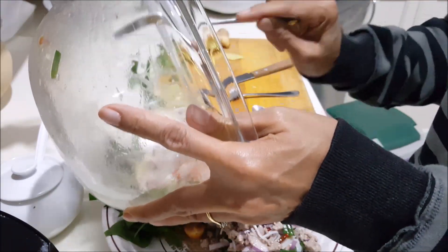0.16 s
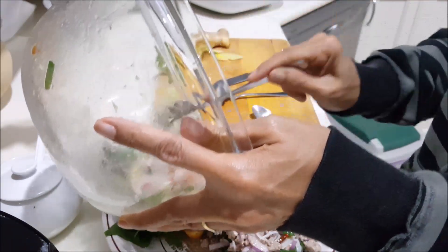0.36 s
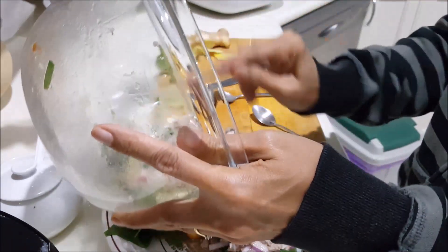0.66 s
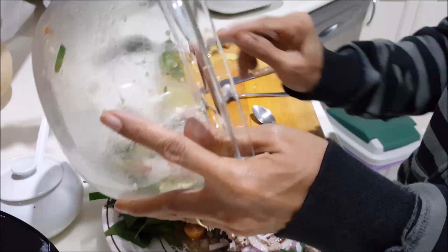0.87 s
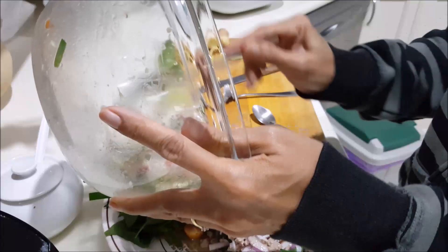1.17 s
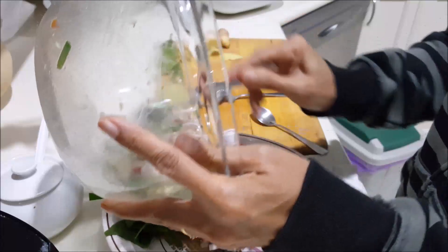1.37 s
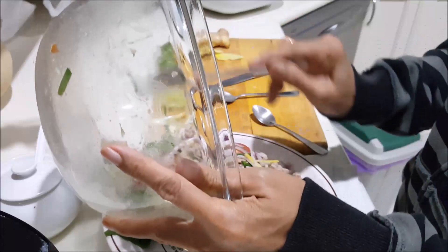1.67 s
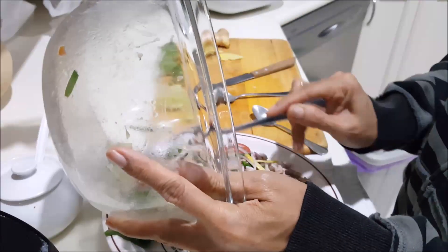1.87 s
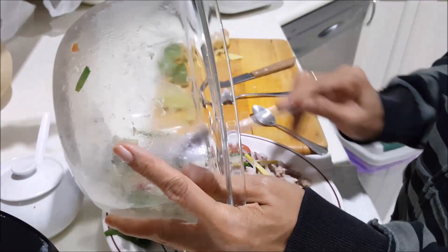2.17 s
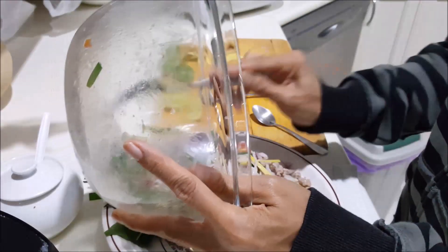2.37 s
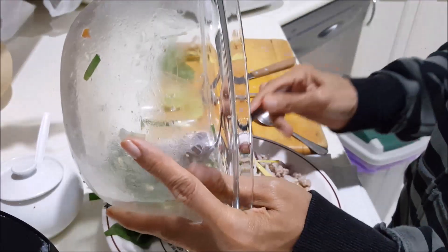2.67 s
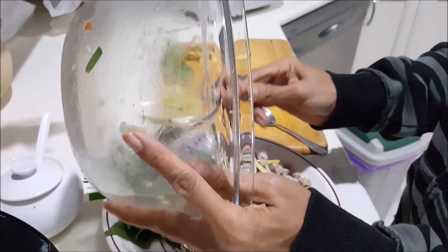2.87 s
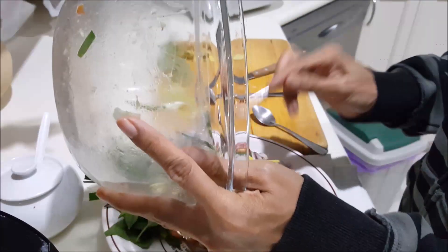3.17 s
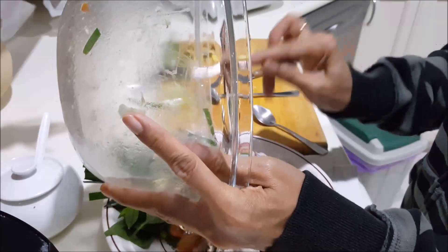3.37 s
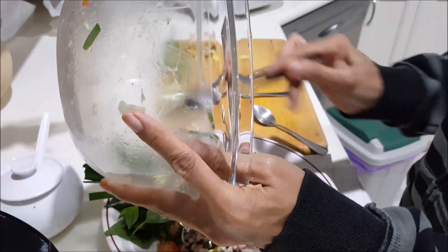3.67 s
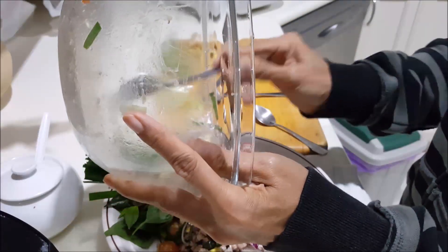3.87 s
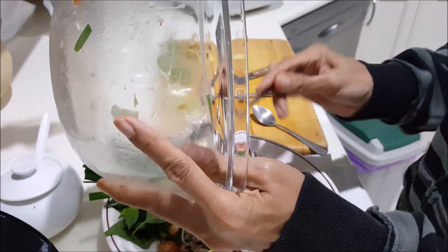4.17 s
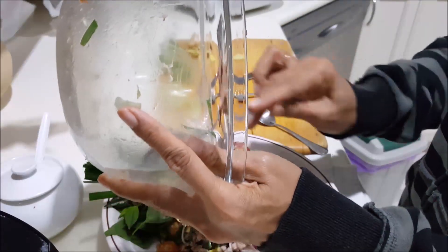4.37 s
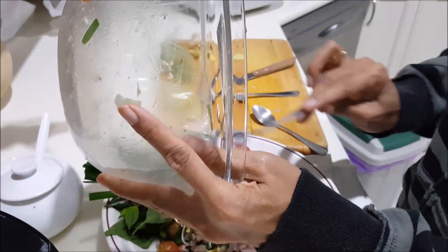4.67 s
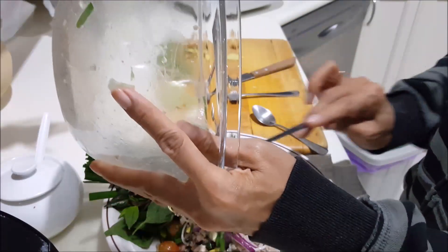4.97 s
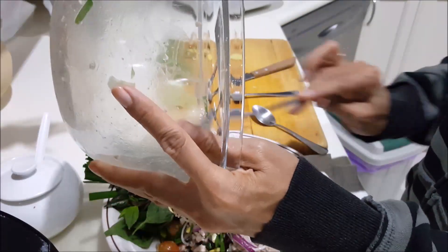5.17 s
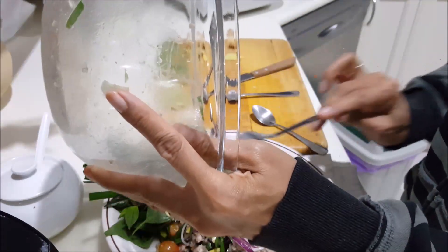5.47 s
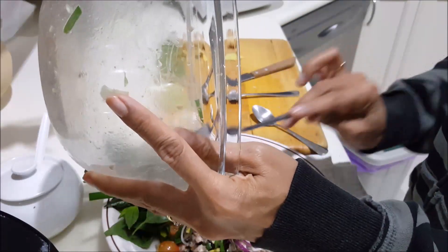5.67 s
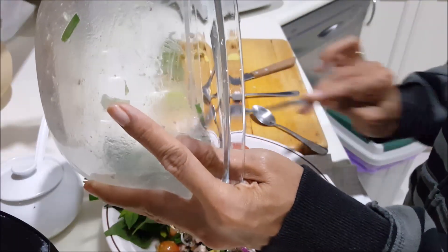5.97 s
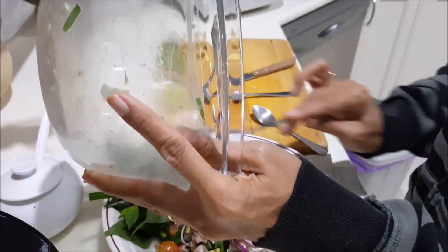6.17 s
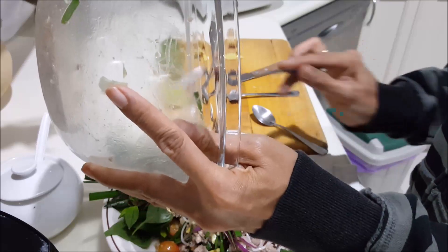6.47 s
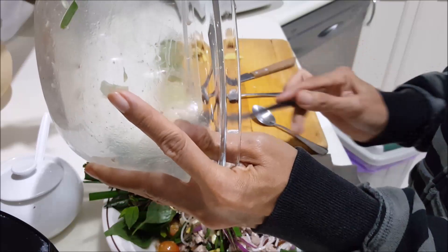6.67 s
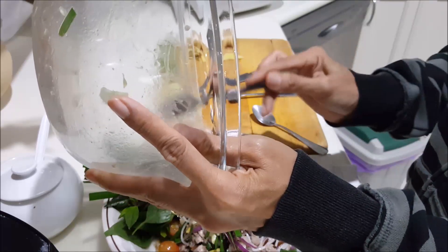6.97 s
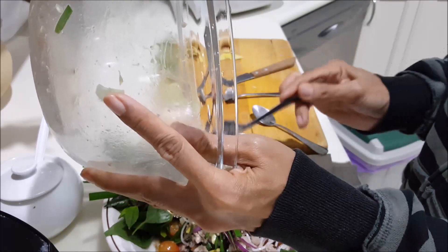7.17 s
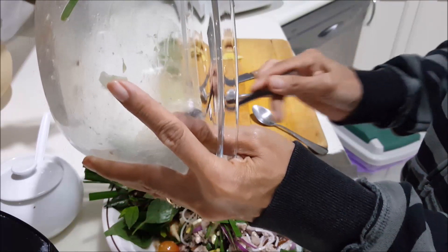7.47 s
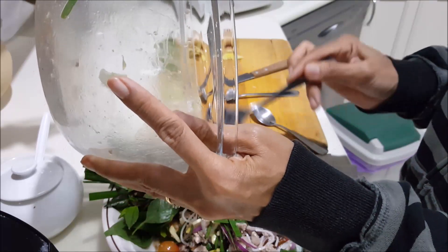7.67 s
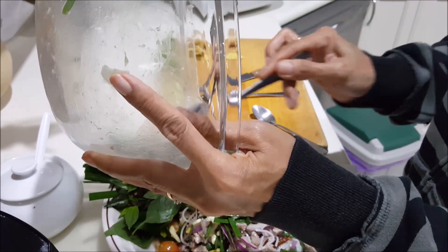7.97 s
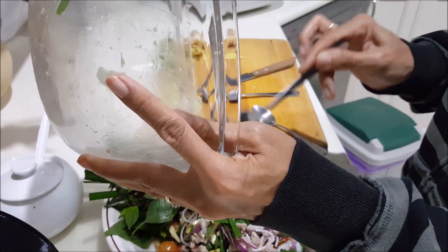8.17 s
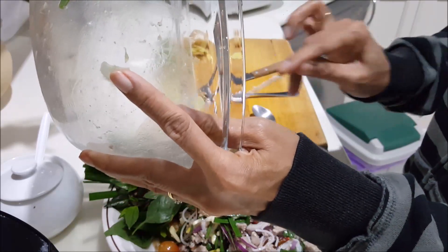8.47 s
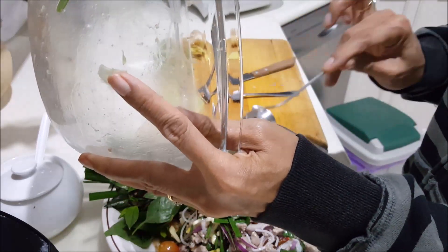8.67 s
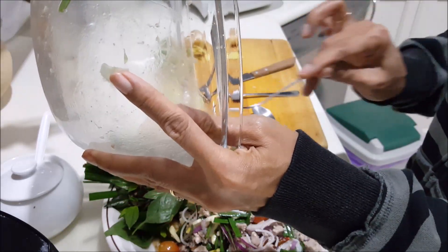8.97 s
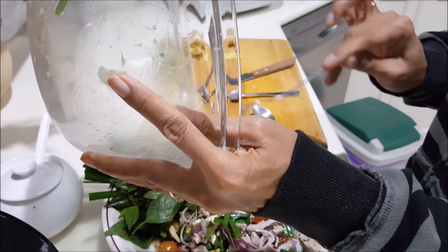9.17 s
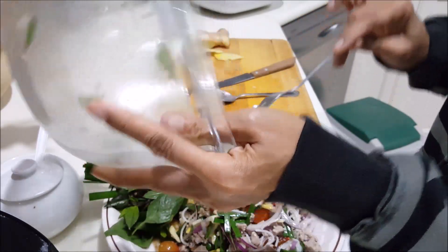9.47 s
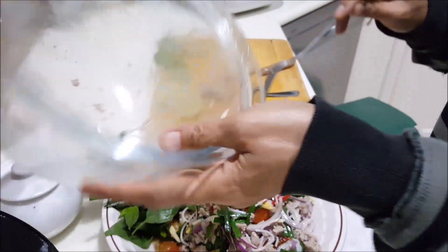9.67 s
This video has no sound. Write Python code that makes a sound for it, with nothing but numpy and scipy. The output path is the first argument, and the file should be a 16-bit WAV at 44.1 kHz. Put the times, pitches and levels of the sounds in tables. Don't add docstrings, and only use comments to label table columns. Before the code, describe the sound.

Sharp glassy clinks from a steel spoon against a wet glass bowl, with tiny squeaks and soft food thuds, in a humming, reverberant kitchen.

```python
import sys
import numpy as np
from scipy import signal
from scipy.io import wavfile

SR = 44100
rng = np.random.default_rng(int(sys.argv[2]) if len(sys.argv) > 2 else 0)


def makeup_ratio(level_db):
    decades = np.asarray(level_db, float) / 20
    return 10 ** decades


def master(y):
    cut = np.clip(np.atleast_2d(y).T, -1, 1)
    pcm = np.round(cut * 32767)
    wavfile.write(sys.argv[1], SR, pcm.astype(np.int16))


N = 433503
LEAD = 4410

BOWL_HZ = [463, 487, 1190, 1228, 2197, 2224, 2315, 3420, 3458, 3512, 4915, 4937]
# (level [dB], t60 [s])
TIP_HZ = [4382, 6406, 6837, 7197, 8290, 8430, 9485, 10690, 11540, 12130, 12770, 14050, 14410, 15390]
TIP = [(3.5, 0.01), (-5.5, 0.12), (4, 0.092), (-5.5, 0.099), (2.5, 0.1), (-6, 0.058), (-20.5, 0.022),
       (-1.5, 0.042), (-27.5, .06), (-24.5, 0.054), (-2, 0.091), (1, 0.088), (-13, .07), (-30.5, .05)]
# (time [s], glass peak [dB], glass lean to low modes [dB], spoon peak [dB], spoon lean to 8 kHz [dB])
BLOWS = [
    (0.6263, -16.5, -1, -18, -5.5),
    (1.3079, -14, -5.5, -15.5, -9.5),
    (1.6856, -11.5, -6, -18, -3),
    (3.3845, -11, -3.5, -11, -8.5),
]
LATE_BLOWS = [
    (6.583, -14.5, 0.5, -39, 1),
    (6.6534, -10.5, -7, -18.5, -14.5),
    (6.7714, -31.5, -35, -64, -4),
    (6.9482, -18.5, -11, -21, -9),
    (7.1617, -20.5, 0.5, -27.5, -7),
    (7.4462, -9.5, -8.5, -17, -2),
    (7.6256, -40.5, 4, -57, 4),
    (7.9044, -15, -14, -24.5, -4.5),
]
DEAD_BLOWS = [
    (4.4025, -25, -15, -28.5, -1.5),
    (8.4518, -42, 8.5, -33.5, 0.032),
]
EDGE_TAPS = [(-.035, -42, -5, -39.5, 3), (0.2384, -27.5, -27, -32.5, 4), (0.418, -68, 2, -62, 13.5),
             (0.955, -41.5, -7.5, -37, 9.5), (1.0856, -53.5, -10, -64.5, -3),
             (2.3914, -47.5, 1, -35.5, 4.5), (2.523, -58, -2.5, -48, -11), (2.7057, -70, -0.5, -56, 2),
             (2.9212, -55, 9, -46.5, 17), (3.9215, -48.5, 2.5, -41.5, 13), (4.1348, -51, -8, -46.5, 2.5),
             (4.545, -68, 0, -50, -13), (4.5934, -74.5, -4, -66, 18)]
TIP_TAPS = [
    (4.915, -29, -10.5, -32, -0.5),
    (5.0981, -41, 1, -43.5, -1),
    (5.3566, -29, -7.5, -24.5, 3.5),
    (5.3844, -37.5, -5.5, -46, 19.5),
    (5.8034, -35.5, 3.5, -35.5, 5),
    (5.8194, -67, -3, -44.5, -17),
    (6.1569, -26, -28, -31, -6),
    (6.188, -32.5, -3.5, -56, 23),
    (6.2094, -37.5, -10, -33.5, 6),
    (8.9912, -31, -2, -35, 3),
]


def rms_one(x):
    return x / np.sqrt(np.mean(x ** 2) + 1e-20)


def at_hz(points, hz):
    points = np.array(points)
    return np.interp(np.log(hz), np.log(points[:, 0]), points[:, 1])


def band(x, low_hz, high_hz):
    sos = signal.butter(2, [low_hz, min(high_hz, .46 * SR)], "band", fs=SR, output="sos")
    return signal.sosfilt(sos, x)


def ring(clicks, hz, t60_s):
    r = makeup_ratio(-60 / (t60_s * SR))
    w = 2 * np.pi * hz / SR
    return signal.lfilter([0, np.sin(w)], [1, -2 * r * np.cos(w), r * r], clicks + 1e-18)


def fading(clicks, tau_s):
    return signal.lfilter([1], [1, -np.exp(-1 / (tau_s * SR))], clicks + 1e-18)


def clock():
    return (np.arange(N + LEAD) - LEAD) / SR


def clicks_at(events):
    clicks = np.zeros(N + LEAD)
    clicks[[round(s * SR) + LEAD for s, db in events]] = makeup_ratio(np.array(events)[:, 1])
    return clicks


def room_tone():
    # (pitch [Hz], level [dB per Hz])
    spectrum = [(25, -39.5), (42, -22.5), (72, -9), (127, -7), (354, -11.5), (476, -13), (863, -17.5),
                (1400, -22.5), (3520, -32.5), (7000, -41.5), (11000, -46.5), (16000, -47)]
    # (pitch [Hz], left-right likeness [0..1])
    likeness = [(30, 0.65), (120, 1), (400, 0.5), (1500, 0.19), (8000, .05)]
    edges_hz = 22 * 2 ** np.arange(0, 10, .5)
    white = rng.standard_normal((2, 2, N + LEAD))
    out = 0
    for k, (low, high) in enumerate(zip(edges_hz, edges_hz[1:])):
        mid, side = band(white[k % 2], low, high)
        hz = np.sqrt(low * high)
        alike = np.clip(at_hz(likeness, hz), 0, 1)
        stereo = np.sqrt(1 + alike) * mid + np.sqrt(1 - alike) * side * [[1], [-1]]
        out = out + makeup_ratio(at_hz(spectrum, hz)) * stereo
    return makeup_ratio(-54.5) * rms_one(out)


def refrigerator():
    mains_hz, mains_db = 60, -59.5
    drone_hz, drone_db, swing_db = 100, -57.5, 3.5
    waver_hz = 3.7 * rms_one(band(rng.standard_normal(N + LEAD), 4.9, 19))
    swell_db = swing_db * rms_one(band(rng.standard_normal(N + LEAD), 0.31, 7.6))
    drone = np.sin(np.cumsum(drone_hz + waver_hz) * 2 * np.pi / SR) * makeup_ratio(drone_db + swell_db)
    mains = makeup_ratio(mains_db) * np.sin(2 * np.pi * mains_hz * clock())
    return np.sqrt(2) * (mains + drone)


def kitchen(x):
    # (pitch [Hz], t60 [s])
    decay = [(300, 1), (1000, 0.78), (2500, 0.77), (6000, 0.64), (10000, 0.59), (15000, 0.6)]
    s = np.arange(SR) / SR
    white, tail = rng.standard_normal((2, SR)), 0
    edges_hz = 150 * 2 ** np.arange(0, 7.6, .5)
    for low, high in zip(edges_hz, edges_hz[1:]):
        tail = tail + band(white, low, high) * makeup_ratio(-60 * s / at_hz(decay, np.sqrt(low * high)))
    early = 1 + 1.7 * np.exp(-s / 0.035)
    onset = np.clip((s - .002) / 0.0024, 0, 1)
    tail = rms_one(tail * early * onset) / np.sqrt(SR)
    return signal.fftconvolve(x[None], tail, axes=1)[:, :len(x)]


def thuds():
    # (time [s], level [dB])
    falls = [
        (0.235, -49),
        (0.949, -45),
        (2.391, -44.5),
        (2.921, -47),
        (3.382, -40),
        (3.921, -39),
        (4.399, -46.5),
        (5.355, -40),
    ]
    clicks = clicks_at(falls)
    return ring(clicks, 290, 0.064) + 0.2 * ring(clicks, 370, 0.013)


def nudges():
    # (time [s], level [dB])
    pushes = [
        (6.32, -49),
        (7.655, -43),
        (8.155, -49.5),
        (8.625, -42.5),
    ]
    return ring(clicks_at(pushes), BOWL_HZ[0], 0.1)


def stick_slip(rows, over_db):
    # (multiple of the pitch, level [dB])
    partials = [(2, 2), (3, -24.5), (4, 6), (5, -2), (6, -30), (7, -5), (8, -6)]
    out = np.zeros(N + LEAD)
    for start_s, length_s, from_hz, to_hz, peak_db in rows:
        part = np.linspace(0, 1, round(length_s * SR))
        phase = np.cumsum(from_hz + (to_hz - from_hz) * part) * 2 * np.pi / SR
        swell = np.sin(np.pi * part ** 1.4) ** 2
        overtones = sum(makeup_ratio(db) * np.sin(round(k) * (phase + k)) for k, db in partials if k * to_hz < 16000)
        tone = np.sin(phase) + makeup_ratio(over_db) * (swell * part) ** 2 * overtones
        at = round(start_s * SR) + LEAD
        out[at:at + len(part)] += makeup_ratio(peak_db) * swell * tone
    return out


def squeaks():
    # (start [s], length [s], start pitch [Hz], end pitch [Hz], peak level [dB])
    pure = [
        (4.995, .042, 14090, 14150, -30.5),
        (6.205, .07, 14030, 14050, -32.5),
        (8.572, .035, 1860, 2050, -41),
        (8.1, .06, 4250, 4140, -48),
        (8.21, .05, 4200, 4190, -58),
        (6.235, .07, 2810, 2840, -47),
        (6.215, .06, 4910, 4920, -45),
        (2.525, .03, 1830, 1830, -52),
        (7.59, .03, 1450, 1450, -42),
        (6.26, .08, 2560, 2570, -51),
    ]
    harsh = [
        (8.535, .055, 1870, 1725, -37),
    ]
    return stick_slip(pure, over_db=-28) + stick_slip(harsh, over_db=9.5)


def scrapes():
    # (start [s], length [s], level [dB])
    drags = [
        (6.185, .085, -41),
        (5.36, .05, -44),
        (4.92, .05, -49.5),
        (8.56, .035, -37),
        (.955, .13, -58.5),
        (5.805, .04, -52.5),
    ]
    s = clock()
    press = sum(makeup_ratio(db) * np.sin(np.pi * np.clip((s - start) / length, 0, 1)) for start, length, db in drags)
    present = rng.random(N + LEAD) < 1500 / SR
    grains = press * rng.standard_normal(N + LEAD) * rng.exponential(1, N + LEAD) * present
    modes = list(zip(TIP_HZ, TIP))[2:9]
    rings = sum(makeup_ratio(db) * ring(grains, hz, t60 * 1.2) for hz, (db, t60) in modes)
    hiss = band(grains + 1e-18, 5900, 13000) * makeup_ratio(2.5)
    return makeup_ratio(-19.5) * rings + hiss + band(grains + 1e-18, 3000, 5300)


def zoned(rows, law, axis):
    rows = np.array(rows, float)
    base_db, share = np.transpose(law)
    return np.c_[rows[:, 0], rows[:, axis], base_db + share * rows[:, axis + 1, None]]


def struck(hits, pitches, modes, zones, ring_db, crack_db, rub_db, scatter_db):
    hits = np.array(hits, float)
    at = np.round(hits[:, 0] * SR).astype(int) + LEAD
    zone_db = hits[:, 1:2] + np.c_[np.zeros(len(at)), ring_db + hits[:, 2:]]
    chance = rng.standard_normal((len(at), len(modes)))
    home = np.array([np.argmin([max(low / hz, hz / high) for low, high, lag in zones]) for hz in pitches])
    grit = rng.standard_normal(N + LEAD)
    out, clicks = np.zeros((2, N + LEAD)), np.zeros(N + LEAD)
    for zone, (low, high, lag) in enumerate(zones):
        clicks[at] = makeup_ratio(zone_db[:, zone])
        rub = makeup_ratio(rub_db) * grit * fading(clicks, 0.014)
        sound = band(makeup_ratio(crack_db) * grit * fading(clicks, 0.0021), low, high)
        for k in np.flatnonzero(home == zone):
            clicks[at] = makeup_ratio(zone_db[:, zone] + scatter_db * chance[:, k]) * (-1) ** zone
            level_db, t60_s = modes[k]
            sound += makeup_ratio(level_db - 9) * ring(clicks + rub, pitches[k], t60_s)
        out += [sound, np.roll(sound, lag)]
    return out


def spoon_rings():
    zones = [(5950, 7300, 5), (3850, 4500, 3), (7300, 9200, 4), (10000, 12000, 4), (12000, 15600, 4)]
    # (level [dB], t60 [s])
    belly_hz = [4253, 4387, 6045, 6390, 6568, 6818, 7010, 7662, 7817, 8340, 8785, 9600, 10350, 11150, 11600,
                12400, 13070, 13600, 14250, 14610, 15260]
    belly_modes = [(-1, 0.046), (-4, 0.035), (-18.5, 0.076), (-0.5, 0.09), (-0.5, 0.26), (-5, 0.11),
                   (-4.5, 0.1), (-1.5, 0.16), (-9.5, 0.15), (-2.5, .1), (-4, 0.11), (-4, 0.05), (-2, 0.063),
                   (-0.5, 0.042), (-0.5, .08), (6.5, 0.05), (-4.5, .07), (-5.5, .07), (-3.5, .07),
                   (-9.5, .06), (-13.5, .06)]
    edge_hz = [4045, 6040, 6400, 7370, 8250, 8620, 8882, 10000, 10920, 11610, 12300, 13040, 13740, 15160]
    edge_modes = [(3.5, 0.066), (-12, 0.06), (-3.5, 0.17), (-1, .05), (-3.5, .05), (0.5, 0.076), (2.5, .06),
                  (-10.5, .04), (4, 0.036), (-2, 0.075), (1.5, .05), (-4, .05), (-0.5, .05), (-12.5, .04)]
    # (level at no lean [dB], share of the lean)
    belly_law = [(-17, 0.67), (1, 1.0), (-16.5, 0.62), (-12, 1)]
    late_law = [(-16, 0.97), (0.5, 0.98), (-32, .4), (-17.5, .9)]
    edge_law = [(-6, 0.023), (-0.5, 0.79), (-8.5, .3), (-9, .1)]
    tip_law = [(-7, -0.18), (1.5, 1.0), (-6, 0.22), (-8, .1)]
    flat = np.r_[zoned(list(BLOWS) + list(DEAD_BLOWS), belly_law, axis=3), zoned(LATE_BLOWS, late_law, axis=3)]
    belly = struck(flat, belly_hz, belly_modes, zones, ring_db=4.5, crack_db=13.0, rub_db=-30.0, scatter_db=5.0)
    edge = struck(zoned(EDGE_TAPS, edge_law, axis=3), edge_hz, edge_modes, zones,
                  ring_db=2.0, crack_db=11.0, rub_db=-34.5, scatter_db=-1.8)
    tip = struck(zoned(TIP_TAPS, tip_law, axis=3), TIP_HZ, TIP, zones,
                 ring_db=2.5, crack_db=7.5, rub_db=-35.0, scatter_db=4.7)
    return belly + edge + tip


def bowl_rings():
    # (level [dB], t60 [s])
    modes = [(-1, 0.21), (-4, 0.1), (-8.5, 0.2), (-8, 0.21), (3, 0.15), (-3.5, 0.12), (-8, .04),
             (-5.5, 0.011), (3.5, 0.13), (0, 0.16), (-4, 0.14), (-4, 0.1)]
    # (low [Hz], high [Hz], right-port lag [samples])
    zones = [(1900, 2600, 4), (380, 600, 5), (1130, 1600, 5), (3200, 3750, 3), (4700, 5200, 2)]
    # (level at no lean [dB], share of the lean)
    free_law = [(-14, 0.43), (1, 1.0), (-4, 0.11), (-11, .1)]
    late_law = [(-17.5, 0.399), (2, 0.82), (-1.64, 0.13), (-9, .1)]
    edge_law = [(2.5, 0.79), (-10, 2.3), (-10.5, 0.9), (-12.5, .4)]
    dead_law = [(-3.5, 0.48), (-4.5, 1.93), (-6.5, 0.61), (-9, 1.1)]
    tip_law = [(-5, 0.41), (-9, 1), (-8.5, 0.5), (-13, 0.94)]
    hand_damping, spoon_damping = 0.97, 0.4
    held = [(db, t60 * (hand_damping if hz < 600 else 1)) for hz, (db, t60) in zip(BOWL_HZ, modes)]
    damped = [(db, t60 * (1 if hz < 600 else spoon_damping)) for hz, (db, t60) in zip(BOWL_HZ, held)]
    free = np.r_[zoned(BLOWS, free_law, axis=1), zoned(LATE_BLOWS, late_law, axis=1)]
    staying = np.r_[zoned(EDGE_TAPS, edge_law, axis=1), zoned(DEAD_BLOWS, dead_law, axis=1),
                    zoned(TIP_TAPS, tip_law, axis=1)]
    glass = struck(free, BOWL_HZ, held, zones, ring_db=3.5, crack_db=10.0, rub_db=-31.5, scatter_db=3.23)
    pressed = struck(staying, BOWL_HZ, damped, zones, ring_db=7.0, crack_db=5.0, rub_db=-28.5, scatter_db=2.5)
    return glass + pressed


def touches():
    no_bass = signal.butter(3, 330, "high", fs=SR, output="sos")
    return signal.sosfilt(no_bass, spoon_rings() + bowl_rings())


def scene():
    loose = thuds() + nudges() + squeaks() + scrapes()
    bowl = touches() + [loose, np.roll(loose, 4)]
    drive = bowl[0] - signal.lfilter(*signal.butter(1, 470, fs=SR), bowl[0])
    echoes = kitchen(drive) * makeup_ratio([[.1], [-1.9]])
    direct = bowl * makeup_ratio([[1.1], [-1.1]])
    mix = direct + echoes + room_tone() + refrigerator() * makeup_ratio([[.4], [-.4]])
    return mix[:, LEAD:]


def roll_off(x):
    return signal.sosfilt(signal.butter(12, 16970, fs=SR, output="sos"), x)


def record(dry):
    # (centre [Hz], width [Hz], share lost)
    dips = [(5550, 500, .65), (9700, 700, .6)]
    for hz, width_hz, share in dips:
        dry = dry - share * signal.lfilter(*signal.iirpeak(hz, hz / width_hz, fs=SR), dry)
    cut = signal.sosfilt(signal.butter(12, 15700, fs=SR, output="sos"), dry)
    rounded = cut / (1 + (cut / .97) ** 6) ** (1 / 6)
    return roll_off(rounded)


dry = scene()
out = record(dry)
master(out)
```